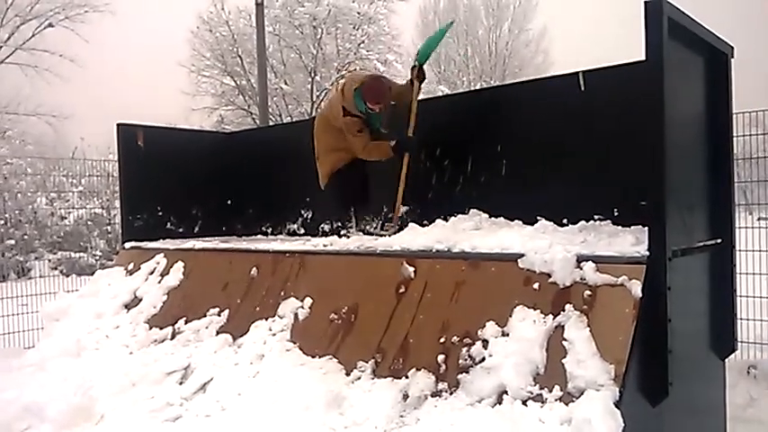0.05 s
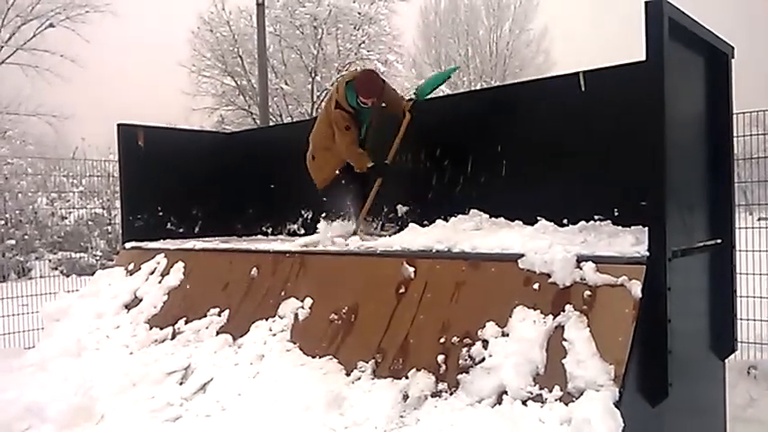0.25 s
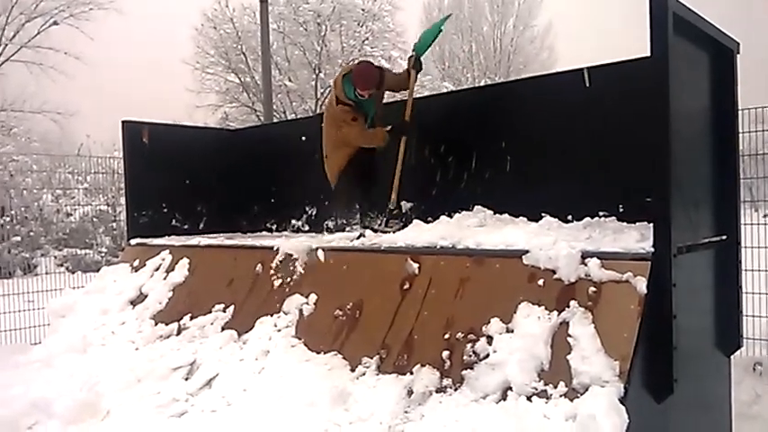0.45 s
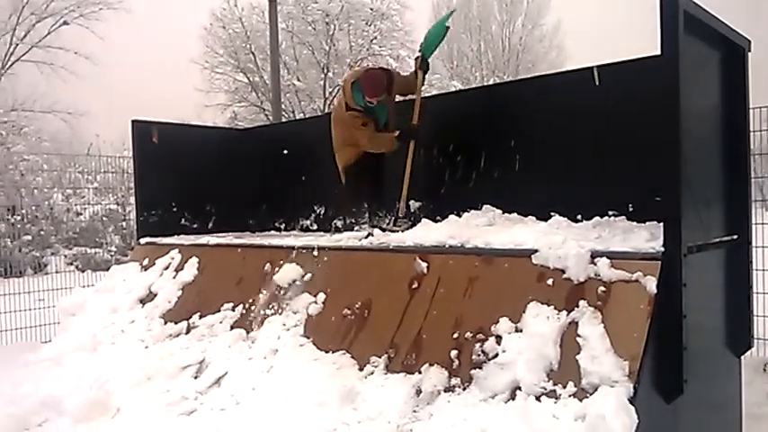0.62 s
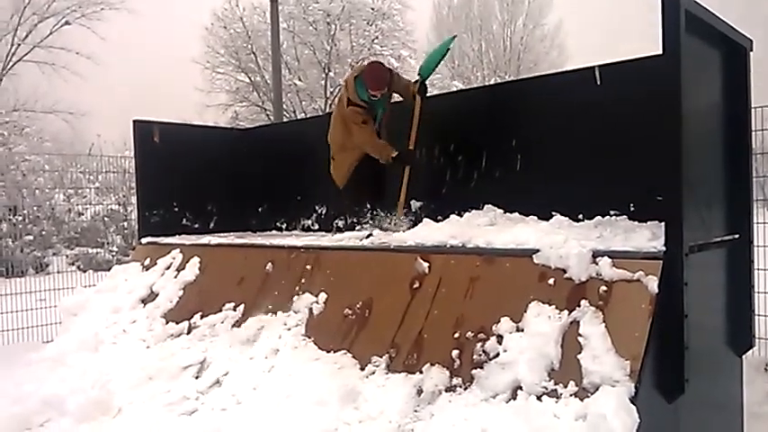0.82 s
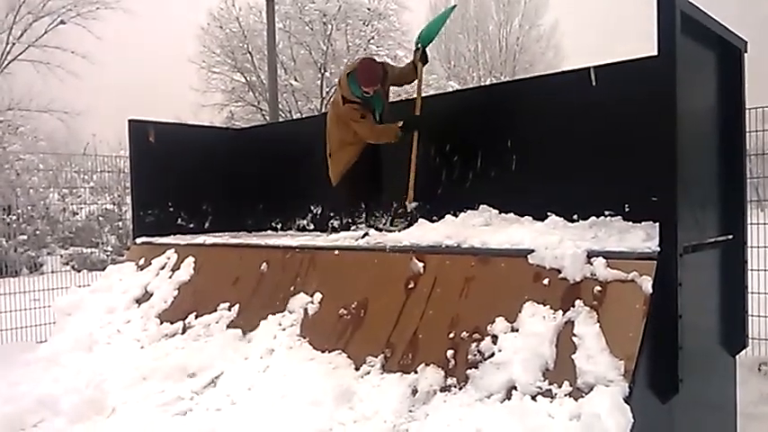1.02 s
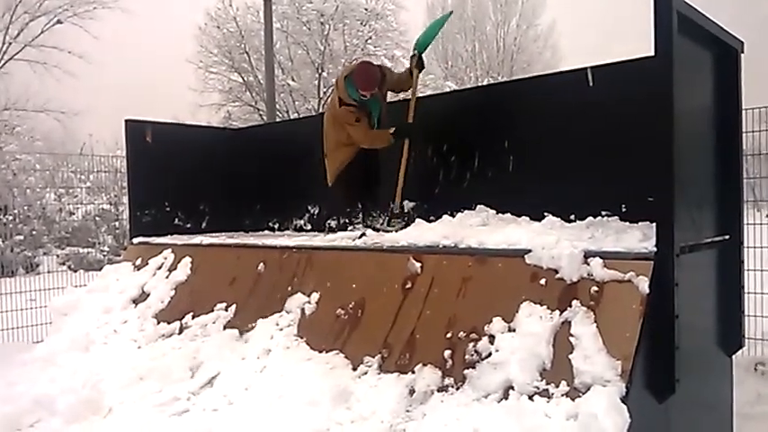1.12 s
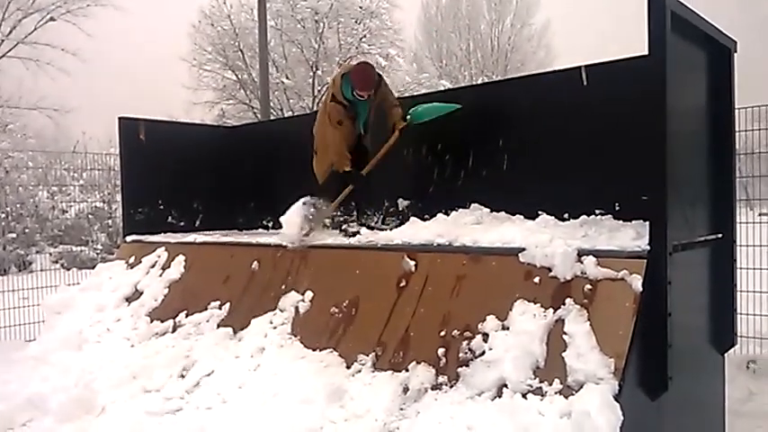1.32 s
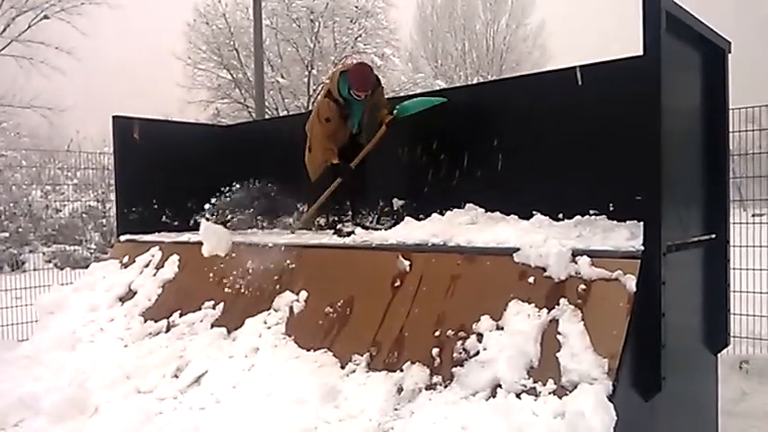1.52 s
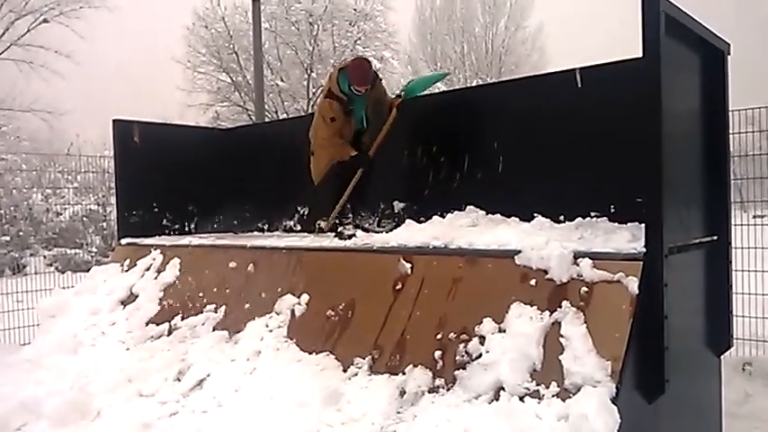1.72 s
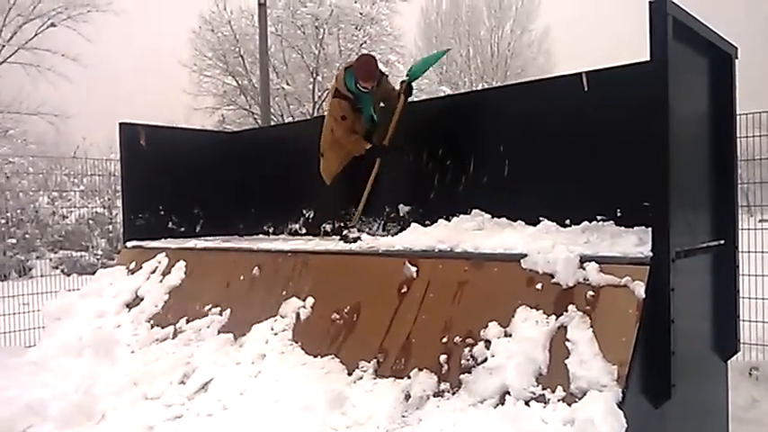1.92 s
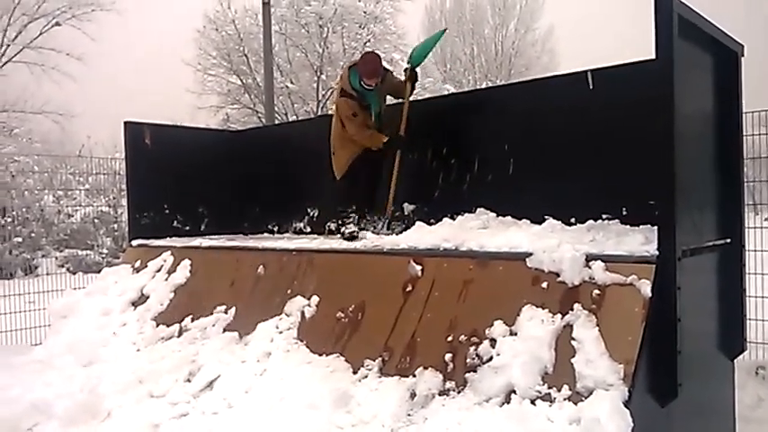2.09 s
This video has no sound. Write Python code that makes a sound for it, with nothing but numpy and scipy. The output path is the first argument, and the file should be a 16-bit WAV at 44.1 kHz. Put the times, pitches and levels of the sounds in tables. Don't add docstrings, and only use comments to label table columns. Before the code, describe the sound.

A shovel chops frozen snow on a hollow wooden ramp outdoors. After faint scraping, a heavy booming, crunching blow lands at 0.24 s. Small knocks lead to a short woody tock at 0.73 and another thud at 0.82 with bright gritty scraping. The hardest, sharpest clustered knock comes at 1.36, its boom lingering. A hoarse, slightly singing scrape follows at 1.83-2.03, over quiet low air and faint hiss.

```python
import sys
import numpy as np
from scipy import signal
from scipy.io import wavfile
from scipy.ndimage import uniform_filter1d

SR = 44100
rng = np.random.default_rng(int(sys.argv[2]) if len(sys.argv) > 2 else 0)


def rack_gain(trim_db):
    fader = np.asarray(trim_db, float)
    return 10 ** (fader / 20)


def to_wav(sig):
    pcm = np.clip(np.atleast_2d(sig), -1, 1) * 32767
    pcm = np.round(pcm).astype(np.int16)
    wavfile.write(sys.argv[1], SR, pcm.T)


N = 94815


def evened(x):
    return x / np.sqrt(np.mean(x ** 2) + 1e-20)


def colour(x, points):
    f, db = np.transpose(points)
    hz = abs(np.fft.fftfreq(8192, 1 / SR))
    curve_db = np.interp(np.log(hz + 1), np.log(f + 1), db)
    log_gain = np.log(rack_gain(np.maximum(curve_db, -100)))
    taps = np.fft.ifft(np.exp(np.conj(signal.hilbert(log_gain)))).real[:4096]
    return signal.fftconvolve(x, taps)[:len(x)]


def add(mix, s, sound):
    part = mix[round(s * SR):][:len(sound)]
    part += sound[:len(part)]


def ring(modes, chance, t):
    spot_db, spot_detune = 4.5, 0.026
    out = np.zeros(len(t))
    for (hz, db, t60), (louder, sharper) in zip(modes, chance):
        fade = rack_gain(db + spot_db * louder - 60 * t / t60)
        out += fade * np.sin(2 * np.pi * hz * (1 + spot_detune * sharper) * t)
    return out


# pitch in Hz, level in dB, time to fall by 60 dB in seconds.
PANELS = [(142.1, -9.5, 0.29), (175.2, -6.5, 0.2), (200.7, -1, 0.16), (229, -7, 0.14), (256, -2.5, 0.12),
          (305, -5, 0.081), (330, -9.5, 0.17)]
# pitch in Hz, level in dB, time to fall by 60 dB in seconds.
BOARDS = [(352.5, 0.5, 0.056), (385, -0.5, 0.049), (461.3, 5.5, 0.094), (497, 3, 0.092), (516, 7, 0.064),
          (686, 5.5, 0.047), (746, 3.5, 0.06), (850, 3.5, 0.037), (957, -12.5, 0.015), (1130, -28, .04),
          (1525, -27.5, 0.03)]
# frequency in Hz, level in dB per Hz.
CRUST = [(530, -21), (900, 0), (1510, -7), (1780, -9), (2000, -7.5), (2700, -11.5), (4450, -30),
         (9000, -55), (11700, -108.5), (19800, -120)]


def blow(knock_db, thud_db, crunch_db, length, draw):
    cracks_per_s, crack_spread_db, crack_fade_db = 500, 2.5, -12
    crumble_t60, crumble_share, crunch_rise_s = .2, .3, 0.0041
    t = np.arange(len(draw)) / SR

    run = rack_gain(crack_fade_db * (t / length) ** 2)
    happens = draw[:, 0] > -np.log(cracks_per_s / SR)
    cracks = run * happens * np.sign(draw[:, 1]) * rack_gain(crack_spread_db * draw[:, 1])
    cracks[0] = 1.87

    out = np.zeros(len(t))
    soft_start = np.minimum(t / 0.0009, 1)
    for modes, db, column in ((BOARDS, knock_db - 12, 2), (PANELS, thud_db - 3.5, 4)):
        chance = draw[:len(modes), column:column + 2]
        body = signal.fftconvolve(cracks, ring(modes, chance, t) * soft_start)[:len(t)]
        out += rack_gain(db) * body / np.sqrt(np.mean(body[:1000] ** 2))

    rise = t / crunch_rise_s
    tail = crumble_share * rack_gain(-60 * t / crumble_t60)
    crumble = draw[:, 3] * (run + tail) * np.minimum(rise, 1)
    crust = colour(crumble + 3 * cracks * np.minimum(rise + 0.28, 1), CRUST)
    return out + rack_gain(crunch_db - 7) * crust / np.sqrt(np.mean(crust[:1000] ** 2))


# start in seconds, board knock in dB, panel thud in dB,
# crunch in dB, length of the cracking in seconds.
BLOWS = [(0.169, -26.5, -31.5, -80, 0.034), (0.238, -14.5, -17, -25.5, 0.033),
         (0.255, -19.5, -23.5, -34, 0.037), (0.29, -36, -24, -35, 0.016), (0.436, -51, -41, -58, 0.014),
         (0.486, -38, -45.5, -64, 0.019), (0.626, -32.5, -69, -53, 0.023), (0.668, -29.5, -50, -49, 0.018),
         (0.73, -24.5, -35.5, -48, 0.0052), (0.823, -19.5, -22, -26, 0.025),
         (0.856, -42, -52, -34.5, 0.022), (0.906, -36, -50, -40, 0.021), (0.99, -25.5, -35, -43.5, 0.011),
         (1.037, -40, -38, -73, 0.012), (1.217, -39, -41.5, -69, 0.017),
         (1.363, -10.5, -21.5, -32.5, 0.012), (1.371, -13.5, -17, -25, 0.018),
         (1.381, -15, -25, -32.5, 0.018), (1.402, -32.5, -40.5, -31.5, 0.013),
         (1.429, -25, -34, -44, 0.021), (1.47, -32, -42.5, -54.5, 0.021), (1.928, -33, -53, -35.5, 0.029),
         (1.954, -25.5, -46, -39, 0.022), (2.113, -44, -46.5, -85, 0.033)]


def blows():
    out = np.zeros(N)
    for s, *rest in BLOWS:
        draw = rng.standard_normal((SR // 3, 6))
        draw[:, 0] = rng.exponential(1, len(draw))
        add(out, s, blow(*rest, draw))
    return out


def boom(hz, db, t60):
    rise_cycles = 0.41
    t = np.arange(SR // 2) / SR
    turns = hz * t + 0.18 * (1 - np.exp(-t / 0.0082))
    swing = np.sin(np.pi / 2 * np.minimum(t * hz / rise_cycles, 1)) ** 2
    return rack_gain(db + 3.0 - 60 * t / t60) * swing * np.sin(2 * np.pi * turns)


# start in seconds, pitch in Hz, level in dB, time to fall by 60 dB in seconds.
BOOMS = [(0.169, 70, -40, 0.37), (0.234, 58.4, -12, 0.35), (.24, 33, -26, 0.27), (0.256, 105, -22.5, 0.12),
         (0.286, 51.6, -19, 0.22), (0.377, 56, -26.5, 0.31), (0.469, 56.5, -36.5, 0.2),
         (.33, 185, -38, 0.29), (.36, 121.7, -35, 0.24), (0.575, 67, -42.5, 0.38),
         (0.668, 87.6, -34.5, 0.6), (0.821, 76.4, -14.5, 0.11), (.86, 68.8, -23, .25),
         (0.887, 45, -29.5, 0.23), (.9, 130, -36.5, .2), (0.951, 59.2, -33, 0.27), (1.0, 135.8, -36, 0.37),
         (1.034, 140, -33, 0.1), (1.047, 55.6, -39.5, 0.23), (1.362, 56, -19.5, 0.59),
         (1.37, 35.2, -29, .2), (1.426, 56.6, -21, 0.39), (1.503, 53.6, -30, 0.1),
         (1.21, 90.5, -47.5, 0.14), (1.321, 60, -51.5, 0.21), (1.555, 56.3, -50, 0.36),
         (1.603, 54.9, -41, 0.57), (1.75, 61.9, -52.5, 1), (1.95, 55.7, -32.5, 0.16),
         (1.7, 54.4, -49.5, 0.34), (1.859, 59.7, -50, 0.26), (2.009, 33, -33, 0.2),
         (2.127, 50.6, -35.5, 0.25)]
# start in seconds, pitch in Hz, level in dB, time to fall by 60 dB in seconds.
TOCKS = [(.113, 410, -53, .9), (.124, 2760, -55, .03), (.127, 2150, -58, .03), (.167, 850, -44, .085),
         (.168, 202, -42, .11), (.197, 2960, -56, .03), (.239, 202, -22, .22), (.385, 260, -44, .15),
         (.6278, 2140, -48, .04), (.628, 3400, -58, .03), (.629, 2500, -51, .04), (.7265, 620, -19, .03),
         (.7285, 215, -31, .18), (.822, 385, -29, .12), (.8243, 1500, -27, .041), (1.06, 2700, -59, .04),
         (1.362, 228, -22, .11), (1.3635, 540, -18.5, .091), (1.368, 661, -21.5, .1),
         (1.37, 975, -14.5, .04), (1.466, 1055, -37, .06), (1.849, 219, -45.5, .2), (1.933, 986, -37, .1),
         (2.06, 125, -45, .2), (2.115, 1000, -47, .05)]


def booms_and_tocks():
    out = np.zeros(N)
    for s, *rest in BOOMS + TOCKS:
        add(out, s, boom(*rest))
    return out


def snap(db, t60, draw):
    t = np.arange(len(draw)) / SR
    burst = colour(draw * rack_gain(-60 * t / t60) * np.minimum(t / .0007, 1), CRUST)
    return rack_gain(db) * burst / np.sqrt(np.mean(burst[:300] ** 2))


# start in seconds, level in dB, time to fall by 60 dB in seconds.
SNAPS = [(.2465, -31, 0.079), (0.258, -38, 0.051), (.278, -40.5, 0.081), (0.302, -47, 0.083),
         (.405, -57, 0.18), (.499, -58, 0.048), (.684, -54, 0.035), (.769, -46, 0.11),
         (.8645, -39.5, 0.037), (.957, -51.5, .05), (.969, -56, 0.033), (.998, -44, 0.032),
         (1.034, -58, 0.023), (1.144, -62, .05), (1.386, -37, 0.027), (1.41, -40, 0.022),
         (1.437, -47.5, .08), (1.468, -49, 0.039), (1.49, -57, 0.12), (1.829, -49, .05), (1.933, -39, .06),
         (2.015, -53, 0.068), (2.041, -63, .04), (2.061, -67, 0.026), (2.126, -68, 0.023)]


def snaps():
    out = np.zeros(N)
    for s, *rest in SNAPS:
        add(out, s, snap(*rest, rng.standard_normal(SR // 8)))
    return out


# frequency in Hz, level in dB per Hz.
GRIT = [(88, -35.5), (150, 1.5), (259, -6.5), (427, 0), (627, -3), (894, -6.5), (1400, -14.5),
        (2900, -22.5), (3600, -35.5), (5200, -43.5), (7000, -64.5), (9100, -86.5), (15400, -120)]
# time in seconds, level in dB, extra level of the low part in dB.
STROKES = [
    [(0, -74, 2), (.1, -68.5, -7), (.2, -60, 8.5), (.33, -57, 11), (.39, -66, 11), (.43, -61.5, 8),
     (.5, -68, 6), (.53, -73, 7.5), (.62, -77, 11)],
    [(.66, -55, -2.5), (.71, -47, -4), (0.755, -48, 0.5), (0.786, -38.5, -16), (.87, -42.5, -5.5),
     (0.915, -43.5, -2), (.94, -46.5, -0.5), (.97, -55, -3), (1.05, -62.5, 6)],
    [(1.1, -65.5, 6), (1.15, -68, 8.5), (1.22, -62, 5.5), (1.33, -70, -9), (1.45, -54.5, 5.5),
     (1.555, -55.5, 1.5), (1.59, -64.5, 0.5), (1.66, -78.5, 14)],
    [(1.72, -73, 6.5), (1.8, -56, -8), (1.859, -40, -38), (1.91, -41.5, -20.5), (1.95, -43, -15.5),
     (2.0, -44.5, -4.5), (2.03, -59, -4.5), (2.08, -72, 10.5), (2.15, -71.5, 9)],
]


def scrape():
    grains_per_s, grain_spread_db, clump_db, split_hz = 7000, 1.5, 2.5, 934
    s, level_db, low_db = np.vstack(STROKES).T
    t = np.arange(N) / SR

    happens = rng.random(N) < grains_per_s / SR
    grains = happens * rng.standard_normal(N) * rack_gain(grain_spread_db * rng.exponential(1, N))

    z = signal.stft(colour(grains, GRIT), nperseg=256, noverlap=192)[2]
    patches = uniform_filter1d(rng.standard_normal(z.shape[::-1]), size=14, axis=0)
    patches = uniform_filter1d(patches, size=4, axis=1)
    clumped = z * rack_gain(clump_db * evened(patches).T)
    grit = signal.istft(clumped, nperseg=256, noverlap=192)[1][:N]

    low = signal.sosfilt(signal.butter(2, split_hz, fs=SR, output="sos"), grit)
    high = signal.sosfilt(signal.butter(2, split_hz, "high", fs=SR, output="sos"), grit)
    scale = rack_gain(np.interp(t, s, level_db)) / np.std(high)
    return scale * (low * rack_gain(np.interp(t, s, low_db)) - high)


# time in seconds, pitch in Hz, level in dB.
SING = [(1.8, 1130, -66), (1.848, 1050, -42), (1.887, 810, -40.5), (1.903, 900, -54), (1.929, 900, -43.5),
        (1.945, 920, -42.5), (1.988, 850, -50), (2.049, 800, -81)]


def sing():
    width_hz = 320
    s, hz, db = np.transpose(SING)
    t = np.arange(N) / SR
    turn = np.exp(2j * np.pi * np.cumsum(np.interp(t, s, hz)) / SR)
    r = np.exp(-np.pi * width_hz / SR)
    narrow = signal.lfilter([1 - r], [1, -2 * r, r * r], rng.standard_normal(N) / turn)
    tone = (turn * narrow).real
    return evened(tone) * rack_gain(np.interp(t, s, db, -120, -120))


# frequency in Hz, level in dB per Hz.
AIR = [(15, -37), (25, 19), (77, -4.5), (291, -9.5), (516, -10.5), (894, -6), (1000, -11), (2510, -28),
       (6000, -29.5), (7800, -78), (13200, -120)]


def winter_air():
    return rack_gain(-55.5) * evened(colour(rng.standard_normal(N), AIR + [(9000, -75.5)]))


def scene():
    mix = blows() + booms_and_tocks() + snaps() + scrape() + sing() + winter_air()
    return mix[None]


# frequency in Hz, level in dB per Hz.
HISS = [(3530, -19.5), (6000, -12.5), (7100, -9), (8900, -6), (15100, -2), (16000, -3)]


def preamp_hiss(heard):
    hiss = rack_gain(-75.5) * evened(colour(rng.standard_normal(N), [(3000, -39.5)] + HISS))
    return hiss * (1 + 3 * uniform_filter1d(abs(heard), size=900))


def roll_off(x):
    return signal.sosfilt(signal.butter(12, 16810, fs=SR, output="sos"), x)


def record(dry):
    dull_hz, edge_hz, ceiling = 4700, 15720, .75
    cut = signal.sosfilt(signal.butter(2, 22, "high", fs=SR, output="sos"), dry)
    soft = ceiling * np.tanh(cut / ceiling)
    dull = signal.sosfilt(signal.butter(1, dull_hz, fs=SR, output="sos"), soft)
    edge = signal.firwin(1023, edge_hz, window=("kaiser", 9), fs=SR)[None]
    return roll_off(signal.oaconvolve(dull + preamp_hiss(dull), edge, "same"))


dry = scene()
out = record(dry)
to_wav(out)
```